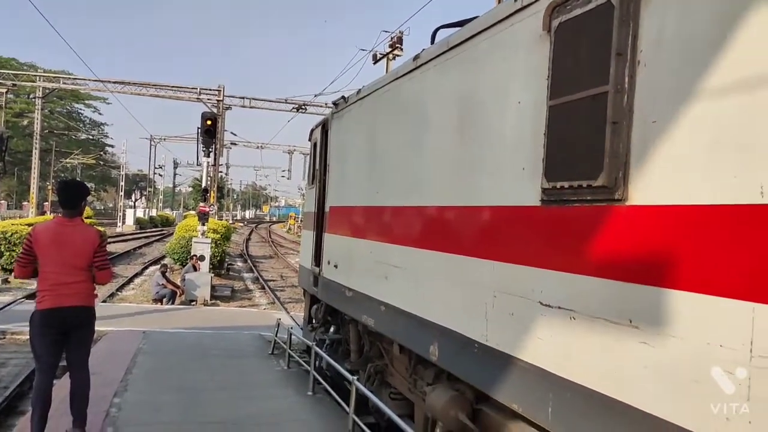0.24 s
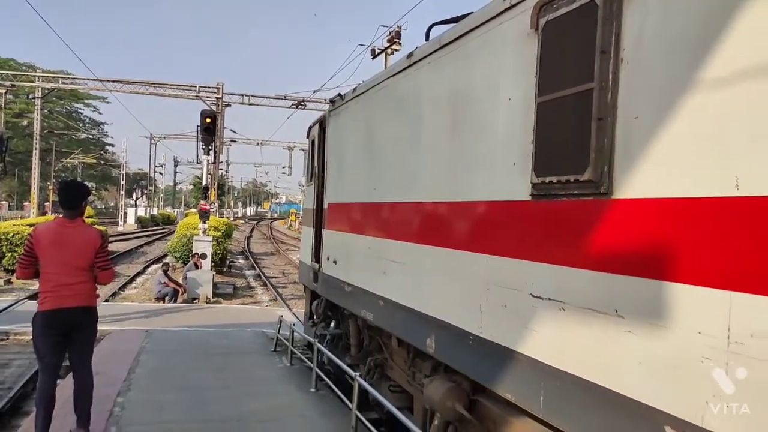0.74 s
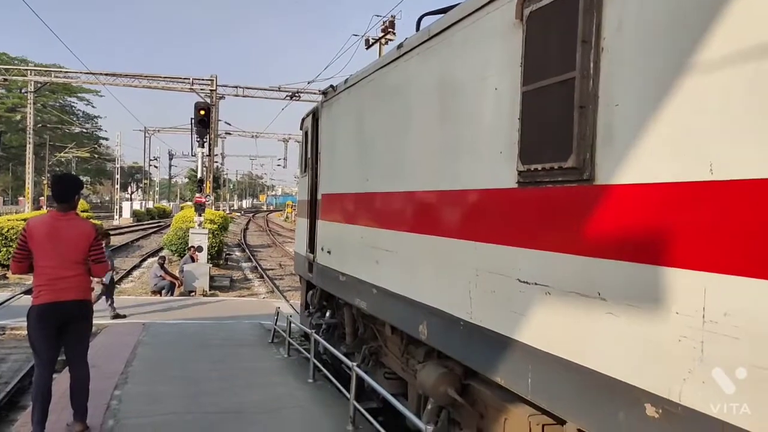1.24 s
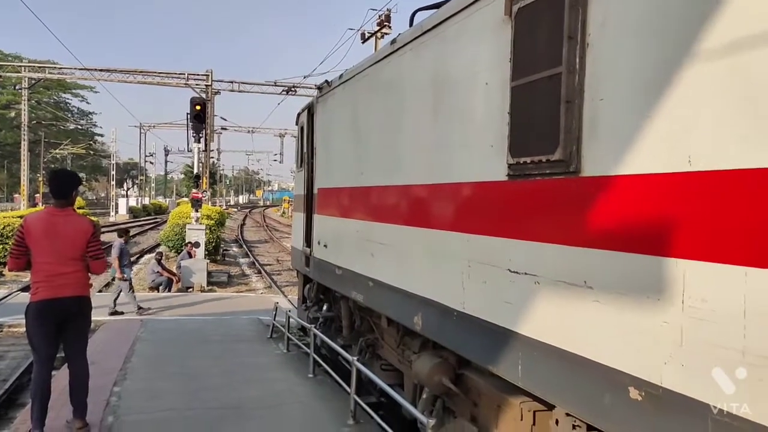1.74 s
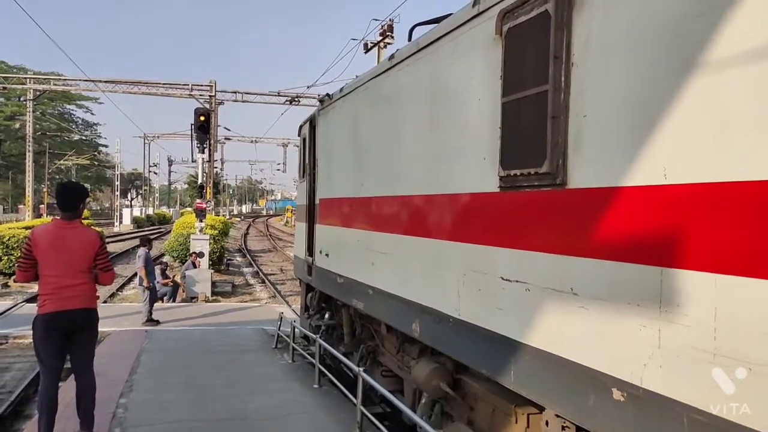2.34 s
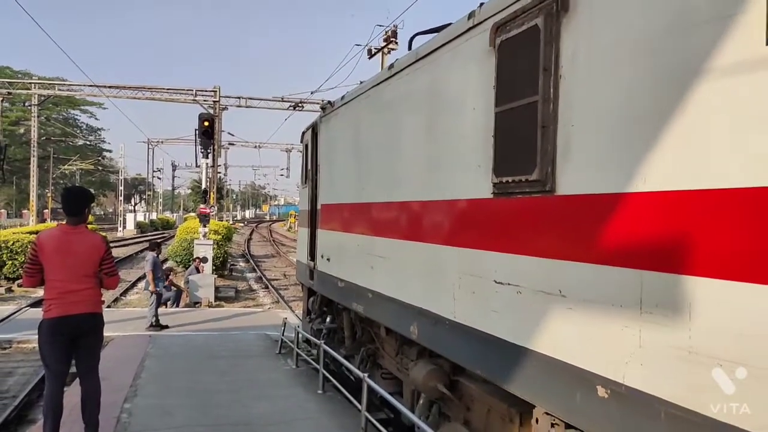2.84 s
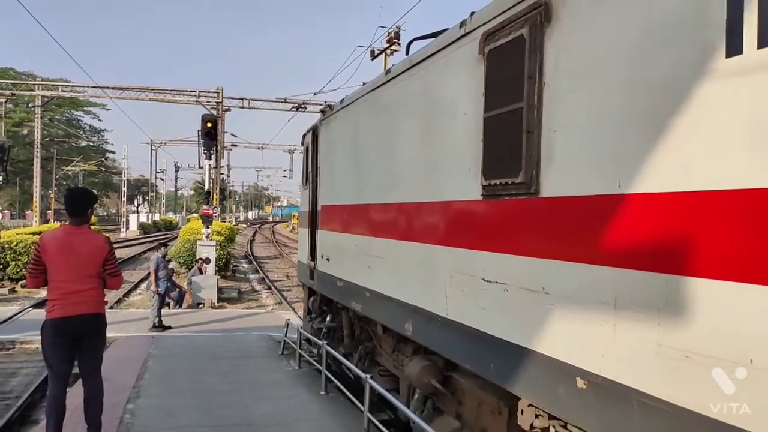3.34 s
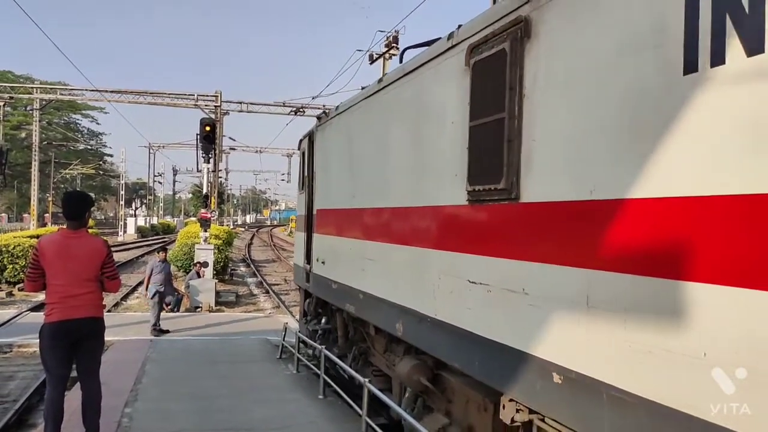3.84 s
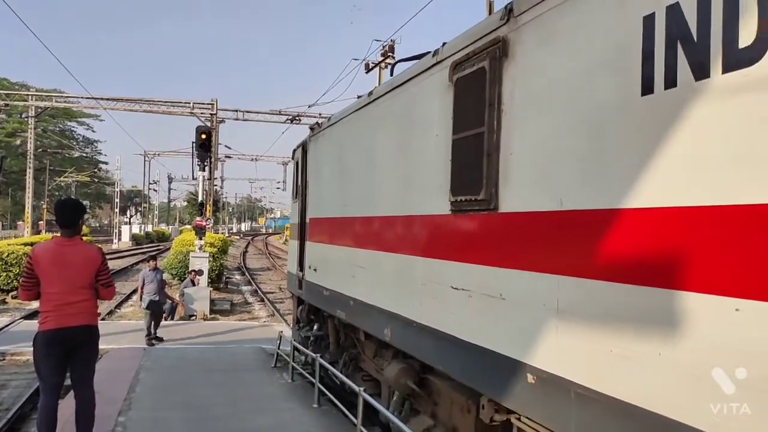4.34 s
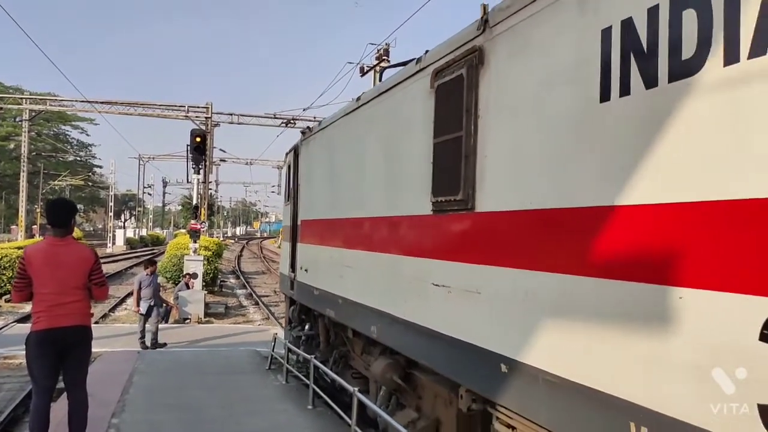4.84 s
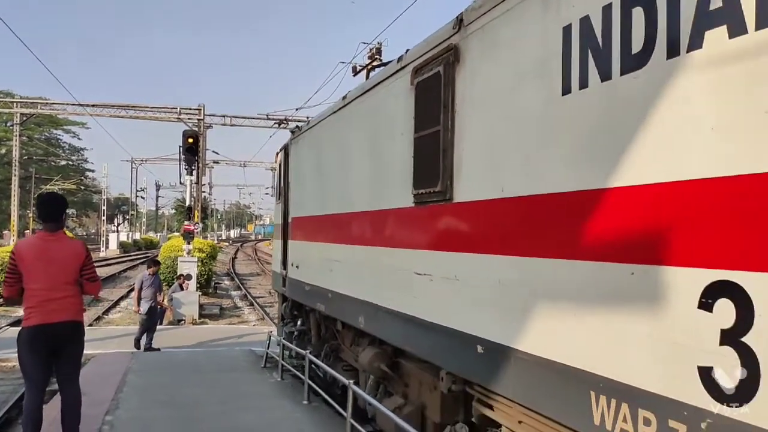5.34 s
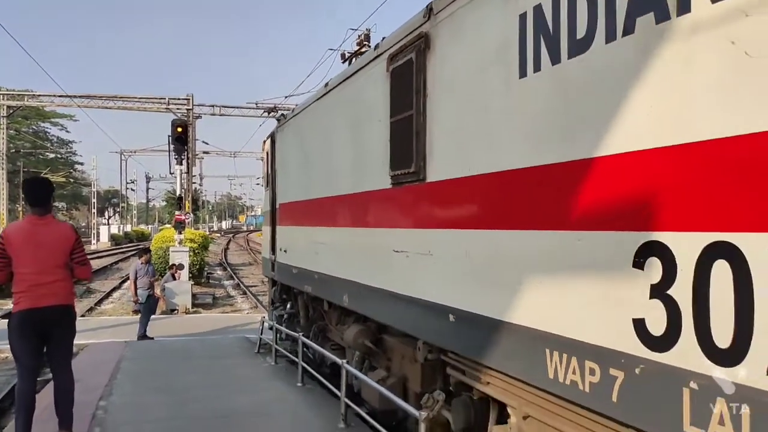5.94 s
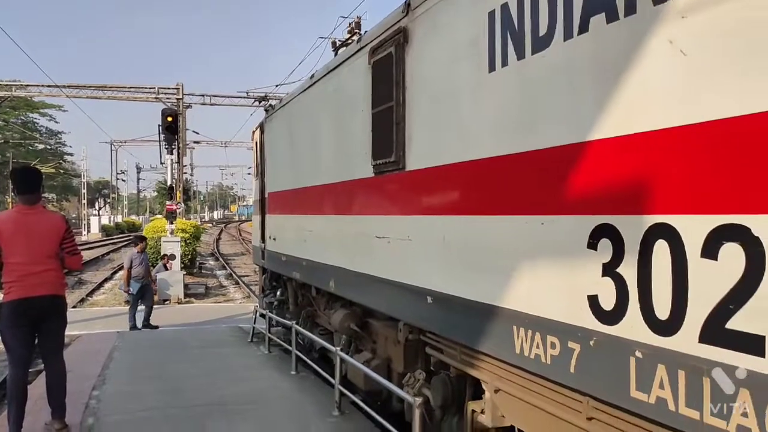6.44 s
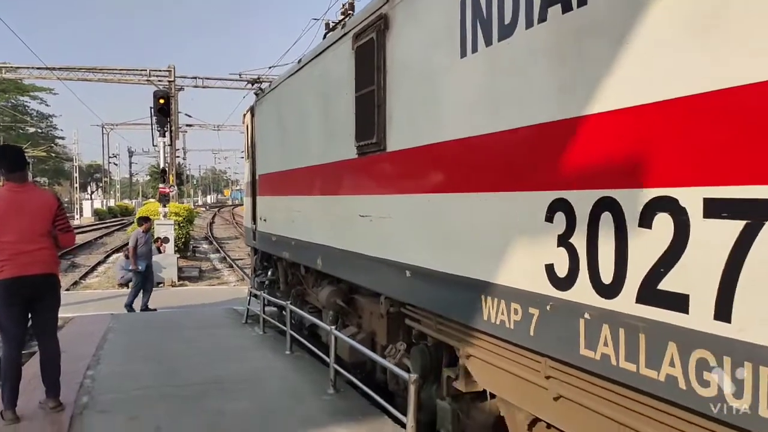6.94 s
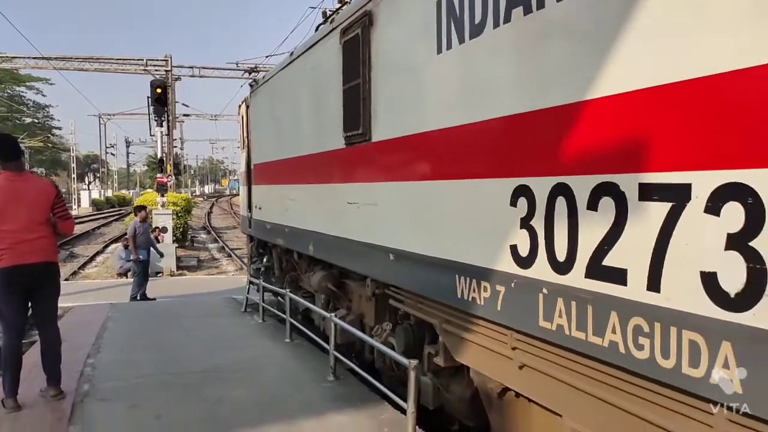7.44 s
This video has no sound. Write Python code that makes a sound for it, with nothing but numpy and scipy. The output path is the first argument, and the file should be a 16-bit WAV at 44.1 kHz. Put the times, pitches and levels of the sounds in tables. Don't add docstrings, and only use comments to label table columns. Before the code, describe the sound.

From 0 s a broad, steady rush of cooling blowers fills the stereo picture, close and outdoors, strongest in the low mids. Within it several fan tones between about 280 and 550 Hz fade in and out, a hollow duct moan near 345 Hz swells around 0.6 s, and transformer buzz with a wavering whine near 1 kHz persists. The rush dips slightly around 1.2 s. From about 1.4 s a bright air hiss slowly rises, gains extra top near 2.3 s, and shuts abruptly at 2.5 s. At 2.7 s one crisp blast of air spits out for roughly a tenth of a second, brightest towards the right. The machine drone then continues, growing gradually nearer. Around 5.5 s the moan returns higher, and from 5.8 s a fuller mid-treble roar joins. Short moans swell between 6 and 7.6 s; the sound ends still running at about 7.7 s.

```python
import sys
import numpy as np
from scipy import signal
from scipy.fft import rfft, irfft, next_fast_len
from scipy.io import wavfile
from scipy.ndimage import uniform_filter1d

SR = 44100
rng = np.random.default_rng(int(sys.argv[2]) if len(sys.argv) > 2 else 0)


def generate_wav(sig):
    pcm = np.round(np.clip(np.atleast_2d(sig).T, -1, 1) * 32767).astype(np.int16)
    wavfile.write(sys.argv[1], SR, pcm)


def undo_db(level):
    steps = np.asarray(level, float) / 20
    return 10 ** steps


N = 338952
TIME = np.arange(N) / SR
SIZE = next_fast_len(N)
HZ = np.maximum(np.arange(SIZE // 2 + 1) * SR / SIZE, 1)

# pitch_hz, level_db (per Hz), right_minus_left_db, port_likeness (0-1)
RUSH = [(173, -99, -3, 0.06), (219, -85, -1.5, 0.9), (296, -52.5, -2, 0.93), (331, -49.5, -0.5, 0.76),
        (468, -52.5, -2, 0.63), (624, -54, -1, 0.55), (812, -57, -1, 0.37), (1225, -61, -2, 0.48),
        (1540, -58.5, -5, 0.23), (2210, -65, -3.5, 0), (3300, -80, 4, 0.27), (4100, -78.5, -3.5, 0.4),
        (5250, -89, -2, 0), (6600, -78.5, -4.5, 0.3), (6870, -78.5, -2, 0), (7630, -85.5, 3, 0.68),
        (9400, -89.5, 0.5, 0.28)]
RUSH_TOP = [(12600, -91.5, -5, 0.3), (13200, -88, -8.5, .35), (13800, -86.5, -12.5, .35),
            (14700, -84.5, -13, .3), (15300, -83.5, -10, .3), (16000, -87, -7, .2)]
# pitch_hz, left_lead_rad
PORT_LEAD = [(0, 0), (430, .6), (1120, 2.7), (1460, 3), (2070, 4.6), (2760, 5), (3530, 8.2), (4050, 7.6),
             (4650, 9.8), (5200, 9.6), (5900, 12.57), (16000, 12.57)]
# time_s, nearness (0-1)
NEARNESS = [
    (0, 0.17),
    (1.2, 0),
    (3, 0.26),
    (4.8, 0.43),
    (6, 0.6),
    (7, 0.67),
    (7.69, 0.96),
]
# pitch_hz, far_db, near_gain_db
VENTS = [(356, -1, 3), (535, 1, 3), (750, -0.5, 0), (1110, -1, 0.5), (1800, -2, 0.5), (2450, -2, 4.5),
         (3020, -4, 8), (4000, 1, 4), (5300, 2, 2.5), (6700, 1, 6), (8500, 0, 4), (11500, 1, -0.5),
         (14500, -7, 4)]
SWING_S, SWING_DB = 1, 1
WANDER_DB = 0.25
GRILLE_S, GRILLE_RISE_S, GRILLE_HZ, GRILLE_OCTAVES, GRILLE_DB = 5.75, 0.35, 2750, 0.3, 2.0
PASSING_DB = 0.8

BLADE_HZ = [282.8, 419.8, 439.6, 551.2]
# left_minus_right_db, left_lead_rad, hidden_db
BLADES = [
    (0.5, 0.83, -61),
    (-4.5, 0.46, -44),
    (7.5, -0.75, -40.5),
    (-3, 0.84, -44),
]
# centre_s, half_width_s, level_db
GLIMPSES = [
    [(.2, 0.81, -42.5), (3.3, 0.6, -37), (4.95, .3, -33.5), (5.55, 0.4, -31.5), (6.2, .3, -37),
     (6.8, 0.45, -33), (7.5, .3, -38)],
    [(1.55, 0.22, -33.5), (4.3, .5, -37), (6.9, .3, -31.5), (7.5, 0.17, -29.5)],
    [(1.3, 0.23, -36.5), (3.2, 0.89, -40.5), (5.2, 0.22, -35), (6.3, 0.33, -37)],
    [(.25, 0.35, -29), (.84, 0.15, -25.5), (1.5, 0.35, -30), (2.0, 0.3, -30.5), (2.4, .2, -32),
     (3.25, .1, -32), (3.47, 0.14, -28.5), (3.75, .14, -31.5), (4.5, .1, -33), (4.85, .05, -35),
     (5.25, .06, -39), (5.88, .07, -29.5), (6.07, 0.14, -29.5), (6.85, 0.07, -33), (7.25, .08, -37),
     (7.6, 0.1, -36)],
]
FADING_DB, FADING_PER_S = 1.2, 9

# centre_s, half_width_s, level_db, pitch_hz
MOANS = [
    (.65, 0.17, -27, 345.4),
    (2.3, 0.16, -33, 341),
    (3.8, 0.11, -32.5, 351.6),
    (5.0, 0.15, -42, 349.4),
    (5.55, 0.095, -27.5, 373),
    (6.15, 0.064, -23, 367.5),
    (6.8, 0.67, -30, 364),
    (7.43, 0.039, -21, 356),
    (7.64, 0.063, -24, 347.8),
]
MOAN_HIDDEN_DB, MOAN_WIDTH_HZ = -40, 26

HUM_HZ = 99.96
MULTIPLES = [6, 9, *range(11, 28), 29, 30, 35, 40, 50, 60, 70]
# left_db, right_db, near_gain_db
BUZZ = [(-47, -50, 6), (-55, -52, -4), (-52, -57, 0), (-47, -53, 1), (-50, -53, 2), (-49, -51, 5),
        (-51, -59, 4), (-48, -56, 1), (-51, -55, 9), (-52, -57, 6), (-52, -57, 2), (-46, -52, 6),
        (-47, -54, 1), (-52, -57, 2), (-52, -57, 3), (-53, -57, 4), (-53, -57, 1), (-57, -58, 3),
        (-68, -65, 1), (-68, -68, 3), (-58, -58, 9), (-65, -63, -1), (-62, -68, 9), (-62, -68, 5),
        (-66, -72, 0), (-65, -65, 5)]
MID_NEARNESS, NEARNESS_SPAN = 0.42, 0.65

WHINE_FAR_DB, WHINE_GAIN_DB, WHINE_LEAD_RAD = -45, 8, 2.55
# centre_s, half_width_s, turn_rad
WHINE_TURNS = [
    (2.05, 0.3, 2.2),
    (2.8, 0.3, 0.5),
    (6.4, 0.22, 0.8),
    (7.2, .4, .3),
]

# pitch_hz, left_db, right_db
LEAK = [(3000, -19, -7), (4470, 3.5, 4.5), (6700, 2, -2), (7070, 6, 13.5), (7700, 5, 14.5), (8600, 1, 12),
        (9500, 1, 3), (12000, 3, 9), (14200, -2, 3), (15500, 1, 5)]
LEAK_START_S, LEAK_SHUT_S, LEAK_RISE_DB, LEAK_PEAK_DB = 1.38, 2.485, 24, 2
SHUT_DROP_DB, SHUT_S, TAIL_DB_PER_S = 20, 0.028, 88
LEAK_SPLIT_HZ = 11000
TOP_FADE_S, TOP_FADE_DB = 2.455, 3.0
WIDEN_S, WIDEN_DB = 2.272, 5.0

# pitch_hz, left_db, right_db
BLAST = [(500, -25, -30), (900, -4, -17), (1600, -2, -5), (2180, 7, 7), (2960, 8, 7), (3600, 9, 9),
         (4150, 12, 13), (4500, 10, 11), (4800, 5, 7), (5050, -6, -4), (5350, 7, 8), (5700, 12, 12),
         (6500, 11.5, 8), (6900, 14, 17), (7500, 15, 21), (8550, 9, 16), (9500, 12, 12.5), (12000, 15, 18),
         (13300, 13, 19), (14200, 10, 15), (14600, 15, 19), (14860, 22, 26), (15150, 15, 18),
         (16000, 16, 18)]
# pitch_hz, left_lead_rad
BLAST_LEAD = [(0, 0), (1000, 2.8), (1500, 2.6), (2000, 0), (3000, -2.1), (4100, -5.2), (5200, -9.5),
              (5900, -12.57), (16000, -12.57)]
BLAST_OPEN_S, BLAST_ATTACK_S = 2.686, 0.018
BLAST_EDGES_HZ = [3000, 4500, 6700, 10000, 13200]
# full_s, end_s, peak_db, climb_db, release_db_per_s
BLAST_BANDS = [
    (2.78, 2.805, 1.5, 8, 140),
    (2.77, 2.81, 2.5, 6, 170),
    (2.785, 2.8, 4, 11, 200),
    (2.725, 2.79, 2, 10, 165),
    (2.745, 2.79, 4.5, 8, 230),
    (2.738, 2.76, 5.5, 20, 230),
]

# pitch_hz, sum_db, difference_db
GATE = [(3000, -24, -24), (5000, -12, -12), (5900, -4, -1), (6500, -3, 0), (7200, -6, 0), (8300, -6.5, 0.5),
        (9800, -2, -.5), (11000, -.5, -1.5), (12800, 1, -.5), (13800, -7, -7), (15500, -2.5, -1)]


def blowers():
    near, = in_time(NEARNESS)
    grille = np.clip((TIME - GRILLE_S) / GRILLE_RISE_S, 0, 1)
    vent_hz, far_db, gain_db = np.transpose(VENTS)
    vent_log_hz = np.log(vent_hz)
    spectrum = air_spectrum()
    gust = drift(12.0)
    centres = np.log(np.geomspace(250, 15000, 18))
    out = 0
    for k, centre in enumerate(centres):
        mask = np.interp(np.log(HZ), centres, np.arange(18) == k)
        band_far_db = np.interp(centre, vent_log_hz, far_db)
        vent_db = band_far_db + np.interp(centre, vent_log_hz, gain_db) * near
        octaves_off = (centre - np.log(GRILLE_HZ)) / np.log(2)
        roar_db = GRILLE_DB * grille * np.exp(-(octaves_off / GRILLE_OCTAVES) ** 2)
        fast_db = np.interp(centre, centres[[0, -1]], [0.9, 1.2])
        flicker_db = 0.1 * gust + WANDER_DB * drift(0.67) + fast_db * drift(16.4)
        band = irfft(spectrum * mask, SIZE)[:, :N]
        out = out + band * undo_db(vent_db + roar_db + flicker_db)
    pan_db = -SWING_DB * np.exp(-(TIME / SWING_S) ** 2) - PASSING_DB * grille
    return out * undo_db([pan_db / 2, -pan_db / 2])


def blade_tones():
    out = 0
    for hz, (pan_db, lead_rad, hidden_db), rows in zip(BLADE_HZ, BLADES, GLIMPSES):
        level_db = glimpses(rows, hidden_db) + FADING_DB * drift(FADING_PER_S)
        out = out + tone(hz, pan_db / 2, -pan_db / 2, lead_rad, waver_rad=0.54) * undo_db(level_db)
    return out


def moan():
    *_, hz = in_time(MOANS)
    swing = drift(MOAN_WIDTH_HZ) + 1j * drift(MOAN_WIDTH_HZ)
    carrier = np.exp(2j * np.pi * np.cumsum(hz) / SR)
    wave = undo_db(glimpses(MOANS, MOAN_HIDDEN_DB)) * swing * carrier
    both = np.real([wave, wave * undo_db(-3.0) * np.exp(-1j * lead(hz))])
    return signal.sosfilt(signal.butter(6, 270, "high", fs=SR, output="sos"), both)


def buzz():
    near, = in_time(NEARNESS)
    out = 0
    for k, (left_db, right_db, gain_db) in zip(MULTIPLES, BUZZ):
        hz = k * HUM_HZ
        swell_db = gain_db * (near - MID_NEARNESS) / NEARNESS_SPAN + 2.5 * drift(3.5)
        out = out + tone(hz, left_db, right_db, lead(hz), waver_rad=2.5) * undo_db(swell_db)
    return out


def whine():
    near, = in_time(NEARNESS)
    level_db = WHINE_FAR_DB + WHINE_GAIN_DB * near + 1.9 * drift(7.0)
    turned_rad = sum(turn * np.exp(-((TIME - s) / half) ** 2) for s, half, turn in WHINE_TURNS)
    return tone(10 * HUM_HZ, level_db, level_db, WHINE_LEAD_RAD - turned_rad, waver_rad=2.4)


def leak():
    opening = np.clip((TIME - LEAK_START_S) / (LEAK_SHUT_S - LEAK_START_S), 1e-3, 1)
    after_s = np.maximum(TIME - LEAK_SHUT_S, 0)
    shut_db = SHUT_DROP_DB * np.minimum(after_s / SHUT_S, 1) + TAIL_DB_PER_S * after_s
    flow_db = LEAK_PEAK_DB + LEAK_RISE_DB * np.log10(opening) - shut_db
    spectrum = air_spectrum(*in_pitch(LEAK))
    low = below(LEAK_SPLIT_HZ)
    fade_db = TOP_FADE_DB * np.clip((TIME - TOP_FADE_S) / 0.03, 0, 1)
    top_db = 3.0 - WIDEN_DB * (TIME < WIDEN_S) - fade_db
    body = irfft(spectrum * low, SIZE)[:, :N]
    top = irfft(spectrum * (1 - low), SIZE)[:, :N] * undo_db(top_db)
    return (body + top) * undo_db(flow_db + drift(18.0))


def blast():
    spectrum = air_spectrum(*in_pitch(BLAST), BLAST_LEAD)
    lowpass = [0, *(below(hz) for hz in BLAST_EDGES_HZ), 1]
    jet = 0
    for low, high, row in zip(lowpass, lowpass[1:], BLAST_BANDS):
        jet = jet + irfft(spectrum * (high - low), SIZE)[:, :N] * burst(*row)
    opened = np.clip((TIME - BLAST_OPEN_S) / BLAST_ATTACK_S, 0, 1)
    return jet * opened * undo_db(0.9 * drift(60.0))


def burst(full_s, end_s, peak_db, climb_db, release_db_per_s):
    before = np.clip((full_s - TIME) / (full_s - BLAST_OPEN_S), 0, 1)
    return undo_db(peak_db - climb_db * before - release_db_per_s * np.maximum(TIME - end_s, 0))


def air_spectrum(left_db=0, right_db=0, bearing=PORT_LEAD):
    level_db, side_db, alike = in_pitch(list(RUSH) + list(RUSH_TOP))
    alike = np.clip(alike, 0, 1)
    shared, own = rfft(rng.standard_normal((2, SIZE))) * np.sqrt(SR / 2)
    right = alike * shared * np.exp(-1j * lead(HZ, bearing)) + np.sqrt(1 - alike ** 2) * own
    return np.array([shared * undo_db(level_db + left_db), right * undo_db(level_db + side_db + right_db)])


def tone(hz, left_db, right_db, lead_rad, waver_rad):
    phase = 2 * np.pi * (hz * TIME + rng.random()) + waver_rad * drift(0.83)
    lead_rad = lead_rad + 0.4 * drift(0.34)
    left = undo_db(left_db) * np.sin(phase)
    right = undo_db(right_db) * np.sin(phase - lead_rad)
    return np.sqrt(2) * np.array([left, right])


def glimpses(rows, hidden_db):
    power = undo_db(hidden_db) ** 2
    for s, half, db, *_ in rows:
        power = power + undo_db(db) ** 2 * np.exp(-((TIME - s) / half) ** 2)
    return 10 * np.log10(power)


def drift(rate_hz):
    r = np.exp(-200 * np.pi * rate_hz / SR)
    noise = rng.standard_normal(N // 100 + 1002)
    slow = signal.lfilter([1], [1, -2 * r, r * r], noise)[1000:]
    return np.interp(np.arange(N) / 100, np.arange(len(slow)), slow / np.std(slow))


def lead(hz, table=PORT_LEAD):
    return np.interp(hz, *np.transpose(table))


def below(edge_hz):
    return 1 / (1 + (HZ / edge_hz) ** 8)


def in_time(rows):
    s, *columns = np.transpose(rows)
    return [np.interp(TIME, s, c) for c in columns]


def in_pitch(rows):
    hz, *columns = np.transpose(rows)
    return [np.interp(np.log(HZ), np.log(hz), c) for c in columns]


def scene():
    return blowers() + blade_tones() + moan() + buzz() + whine() + leak() + blast()


def gate(x, scatter_db):
    pad = 109
    window = np.sin(np.pi * (np.arange(2048) + 0.5) / 2048)
    both = np.pad([x[0] + x[1], x[0] - x[1]], ((0, 0), (pad, 0)))
    hz, _, lines = signal.stft(both, SR, window, 2048, 1024)
    local = uniform_filter1d(np.abs(lines).max(axis=0), size=32, axis=0)
    local = uniform_filter1d(local, size=3, axis=1)
    jumps = rng.standard_normal((2, 33, lines.shape[2]))
    jumps = uniform_filter1d(jumps, size=2, axis=2) * np.sqrt(2)
    jumps = np.repeat(jumps, 32, axis=1)[:, :len(hz)]
    gate_hz, *levels = np.transpose(GATE)
    threshold_db = np.array([np.interp(hz, gate_hz, db) for db in levels])[..., None]
    strong = np.abs(lines) > local * undo_db(threshold_db + scatter_db * jumps)
    ungated = hz[:, None] < gate_hz[0]
    kept = lines * (strong | ungated)
    total, difference = signal.istft(kept, SR, window, 2048, 1024)[1][:, pad:pad + N]
    return np.array([total + difference, total - difference]) / 2


def top_cut(x):
    return signal.sosfilt(signal.butter(12, 15780, fs=SR, output="sos"), x)


def record(dry):
    gated = gate(dry, scatter_db=5)
    return top_cut(gated)


dry = scene()
out = record(dry)
generate_wav(out)
```